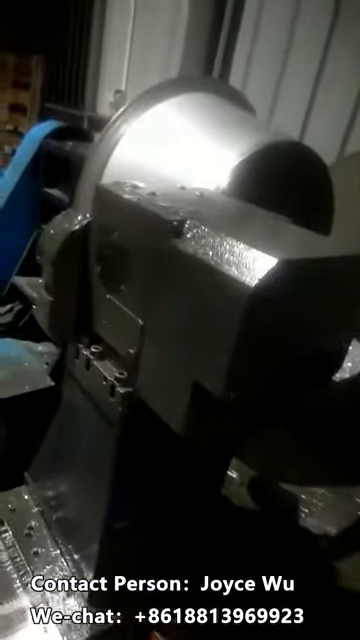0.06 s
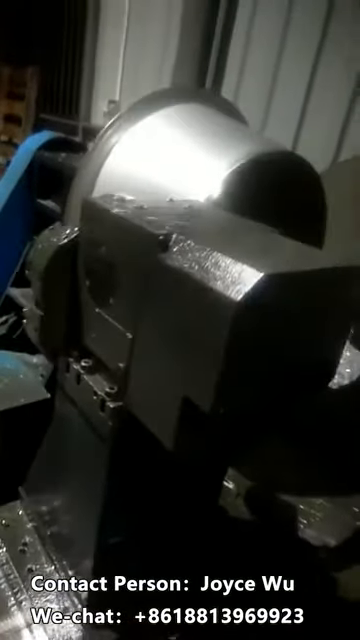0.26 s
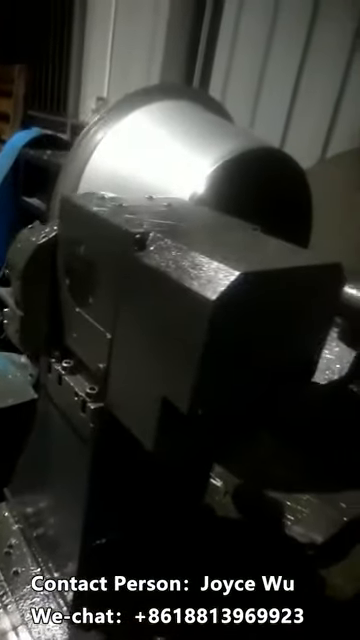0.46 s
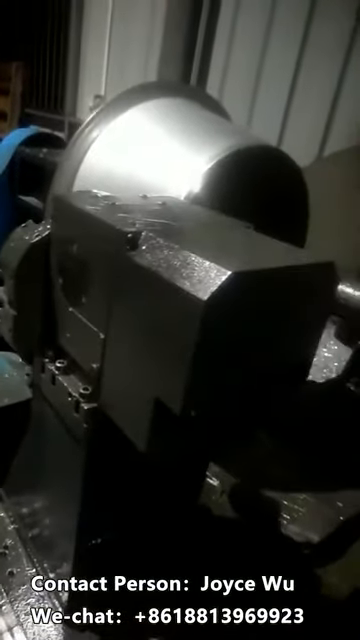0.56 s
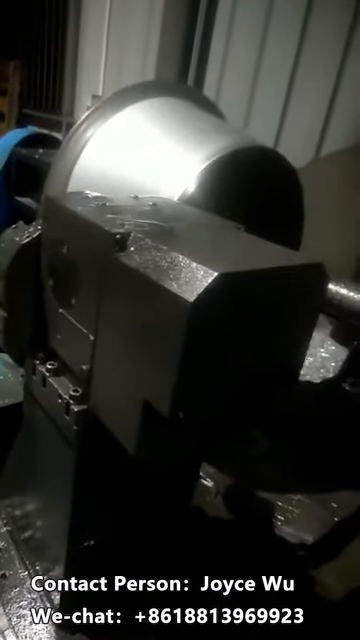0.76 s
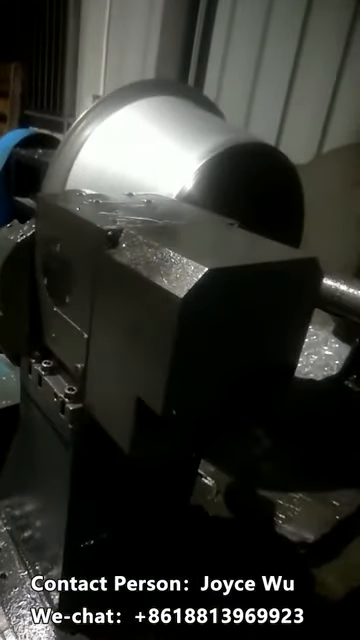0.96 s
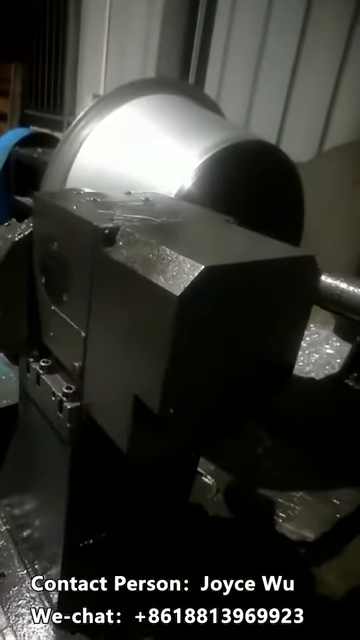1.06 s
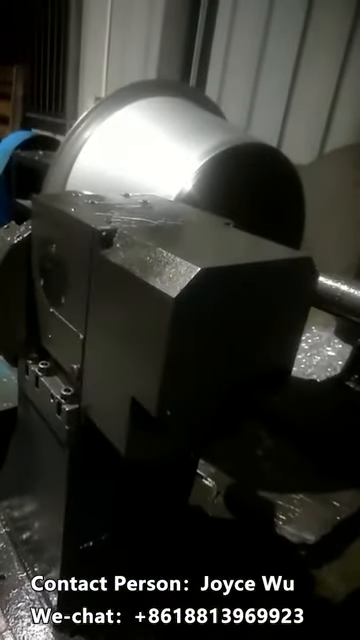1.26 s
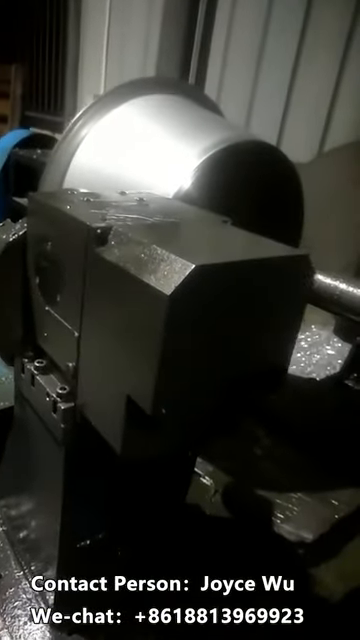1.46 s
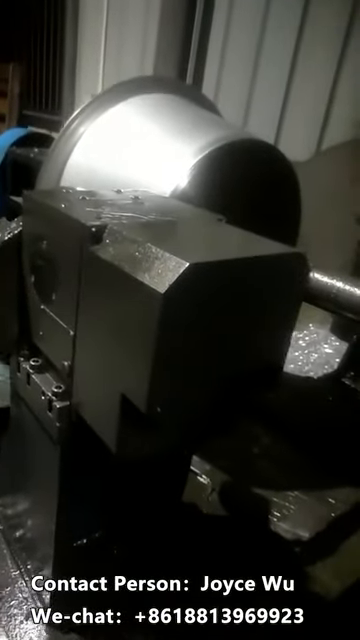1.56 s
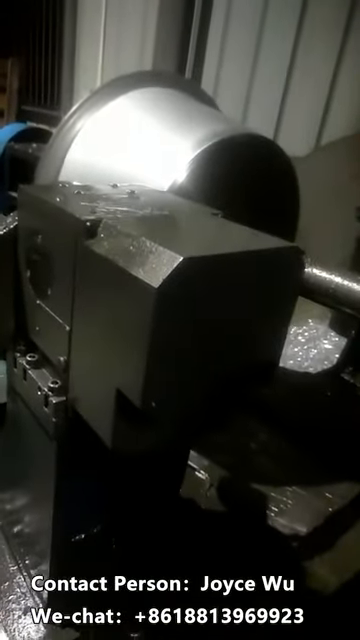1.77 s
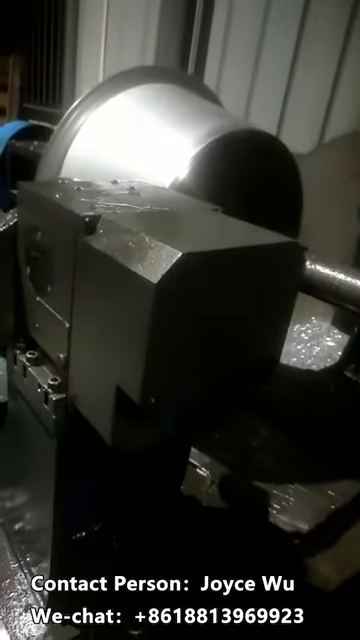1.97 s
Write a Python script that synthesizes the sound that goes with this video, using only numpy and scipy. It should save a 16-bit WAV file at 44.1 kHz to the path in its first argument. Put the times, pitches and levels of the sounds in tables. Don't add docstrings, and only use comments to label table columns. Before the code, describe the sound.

Metal squeal from a roller pressing a spinning metal shell, rising slightly over steady rubbing hiss

```python
import sys
import numpy as np
from scipy import signal
from scipy.fft import rfft, irfft
from scipy.io import wavfile
from scipy.ndimage import uniform_filter1d

SR = 44100
rng = np.random.default_rng(int(sys.argv[2]) if len(sys.argv) > 2 else 0)


def bounce(signal):
    frames = np.transpose(np.atleast_2d(signal))
    limited = np.clip(frames, -1, 1)
    pcm = np.round(limited * 32767).astype(np.int16)
    wavfile.write(sys.argv[1], SR, pcm)


def convert_level_to_amplitude(level_db):
    exponent = np.asarray(level_db, float) / 20
    return 10 ** exponent


N = 88244

# (time [s], level [dB], readiness to be kept [-2..2])
AIR_COURSE = [(0, -78, 0.7), (.28, -74, .3), (.5, -82.5, -1.3), (.72, -66.5, -1.1), (.9, -65, 1.6),
              (1.3, -62, 1.8), (1.7, -68.5, 1.9), (2.0, -70.5, 0.17)]
# (frequency [Hz], level [dB])
AIR_COLOUR = [(4500, 18.5), (4720, 5.5), (4950, -0.5), (5200, 9), (5500, 3), (6200, 1), (7000, -5),
              (9600, -5.5)]
# (frequency [Hz], width [Hz], level [dB])
WHISTLES = [(5210, 150, -67.5), (4710, 150, -67), (5770, 120, -77.5)]
# (time [s], hum level [dB], rumble level [dB])
MOTOR_SURGE = [(0, -57, -70), (.12, -68, -69), (.18, -89.5, -84), (.3, -93, -58.5), (.46, -72, -72.5),
               (.57, -36, -47), (.65, -35, -47), (.72, -34.5, -49), (.8, -53, -62), (.9, -48, -60.5),
               (1.03, -54.5, -67), (1.1, -66.5, -67.5), (1.22, -81.5, -63), (1.45, -84.5, -67),
               (1.6, -82.5, -79.5), (1.75, -75.5, -80), (2.0, -69, -69)]
# (frequency [Hz], level [dB], wobble [dB], phase slip [rad])
MOTOR_HUM = [(118, -0.5, 3, 0.26), (101, -10.5, 3.5, .6), (131, -9.5, 6.5, 0.57)]
# (frequency [Hz], density [dB per Hz])
HISS_SPECTRUM = [(150, -50), (400, -15), (650, -20.5), (900, 0), (1350, -7.5), (2600, -2), (3550, -12),
                 (4400, -34.5)]
# (frequency [Hz], width [Hz], level [dB], drift [dB/s])
SHELL_RINGS = [(368.8, 19, -51.5, -8.5), (601, 30, -65, 4.5), (861, 19, -40.5, -10.5),
               (896, 11, -48.5, 4.9), (1164, 20, -48, 2), (2560, 60, -40, -4.5), (2648, 130, -39, -1.5),
               (2804, 210, -38.5, -1.5)]
# (time [s], fundamental [dB], third overtone [dB], higher overtones [dB], hiss [dB],
# hiss tilt [dB/octave])
SLIP_SHAPE = [(0, -6, -4, 0, 0.5, 0.5), (.12, -3, 0.5, -1, -1.5, 0.5), (.35, 1, -2.5, 1.5, 1.5, 0.5),
              (.62, -2, -2.5, -8.5, 2.5, -0.5), (.74, -3.5, -3, 8, 0, -1), (.8, -12, -2, -3.5, 2.5, 2),
              (.86, -5.5, -1, 8.5, -1.5, 2), (.905, -3, -1, -3.5, 3.5, 2.5), (.96, 0, 8, 5.5, 0, 1.5),
              (1.02, -6.5, 3.5, 2.5, -0.5, 3), (1.2, 4.5, 5.5, 0.5, -3.5, 1.5),
              (1.35, 1.5, -4.5, 4, -2.5, 0.5), (1.41, -1, 0, -8.5, -1.5, 1), (1.5, -0.5, -5.5, 1.5, -3, 0),
              (1.6, 4, -10, -5.5, -3.5, 2.5), (1.76, -6.5, -1.5, -3.5, -1.5, 2.5),
              (1.9, 5.5, 1.5, -0.5, 2, 3), (2.0, -0.5, 3, -2.5, -3, 3.5)]
# (time [s], frequency [Hz])
CHATTER_PITCH = [(0, 475.5), (.26, 480.5), (.52, 491.5), (.78, 502), (1.0, 509), (1.2, 512.8),
                 (1.45, 511.8), (1.75, 510), (2.0, 506)]
# (time [s], squeal level [dB])
ROLLER_CONTACT = [(0, -25.5), (.12, -22), (.26, -20), (.38, -20), (.52, -24), (.7, -23), (.85, -25),
                  (1.0, -24.5), (1.07, -21.5), (1.2, -27), (1.3, -22.5), (1.45, -21), (1.65, -19),
                  (1.78, -18.5), (1.86, -26), (1.94, -19), (2.0, -20.5)]
# (multiple [1], level [dB], wobble [dB], skirt [dB], share of slip shape followed [0..1])
OVERTONES = [(1, -24, 1.9, -10, 1), (2, -1, -0.68, -9.5, 1), (3, -9, 0.25, -5.5, 1), (4, -20, 0, -5, 1),
             (5, -14, 2, -1.5, 0.68), (6, -17.5, 3, 0.5, 0.1), (7, -30, 6, 6.5, 0.55),
             (8, -34, 1, -4.5, 0.47), (9, -41.5, -0.5, -0.5, .3)]
# (frequency [Hz], width [Hz], lift [dB])
SHELL_MODES = [(506.6, 29, 12), (1649, 82, 5.5), (2098, 180, 17.5), (2550, 90, 1), (3065, 80, -1.5)]
# (time [s], length [s], depth [dB])
ROLLER_SKIPS = [
    (0.058, .03, -6.5),
    (0.188, 0.034, -6.5),
    (.31, 0.046, -14.5),
    (0.443, 0.033, -5.5),
    (0.634, 0.016, 0.5),
    (1, 0.028, -6),
    (1.122, 0.037, -10.5),
    (1.732, 0.028, -12),
    (1.922, 0.014, -27),
    (1.968, 0.026, -5),
]

AIR_DB, BED_DB = -12.5, -87.5
PATCH_HZ, PATCH_S, PATCH_SCATTER_DB, DROPPED_DB = 217, 0.039, 3.5, -26.5
KEEP_DB = 12
HISS_DB, FLICKER_DB, SWELL_DB = -26, 1.55, -0.76
SHAFT_HZ, SHAFT_DB, SKIRT_HZ = 10, 2, 23.8
VOICE_TOP_HZ = 4385


def curve(table, column):
    rows = np.array(table, float)
    return np.interp(np.arange(N) / SR, rows[:, 0], rows[:, column])


def unit(x):
    return x / np.sqrt(np.mean(np.abs(x) ** 2))


def band(hz, width_hz, order=2):
    f_hz = np.arange(N // 2 + 1) * SR / N
    bell = np.exp(-0.5 * (2 * (f_hz - hz) / width_hz) ** order)
    return unit(irfft(rfft(rng.standard_normal(N)) * bell, N))


def walk(rate_hz):
    return band(0, 2 * rate_hz)


def hold_patch(x):
    hold = int(PATCH_S * SR)
    return np.repeat(x[::hold], hold)[:N]


def air():
    patches, colour = 0, np.array(AIR_COLOUR, float)
    for k in range(24):
        hz = 4500 + k * PATCH_HZ
        colour_db = np.interp(hz, colour[:, 0], colour[:, 1])
        readiness = curve(AIR_COURSE, 2) + walk(6) + colour_db / KEEP_DB
        kept = hold_patch(readiness > 0) * 1.0
        db = colour_db + DROPPED_DB * (1 - kept) + PATCH_SCATTER_DB * hold_patch(walk(8))
        patches = patches + uniform_filter1d(convert_level_to_amplitude(db), size=500) * band(hz, PATCH_HZ, order=8)
    whistles = 0
    for hz, width_hz, db in WHISTLES:
        wobble_db = 1.7 * walk(9)
        gate_db = -29 * uniform_filter1d((walk(7) < 0) * 1.0, size=700)
        whistles = whistles + convert_level_to_amplitude(db + wobble_db + gate_db) * band(hz, width_hz, order=8)
    bed = convert_level_to_amplitude(BED_DB) * band(7100, 5000, order=8)
    return convert_level_to_amplitude(curve(AIR_COURSE, 1) + AIR_DB) * patches + whistles + bed


def motor():
    t, hum = np.arange(N) / SR, 0
    for hz, db, wobble_db, slip_rad in MOTOR_HUM:
        gain = convert_level_to_amplitude(db + wobble_db * walk(11))
        hum = hum + gain * np.sin(2 * np.pi * hz * t + slip_rad * walk(6))
    rumble = convert_level_to_amplitude(2 * walk(27)) * band(240, 220)
    rumble = rumble + convert_level_to_amplitude(-25.5 + 4 * walk(8)) * band(35, 50)
    return convert_level_to_amplitude(curve(MOTOR_SURGE, 1)) * unit(hum) + convert_level_to_amplitude(curve(MOTOR_SURGE, 2)) * rumble


def rubbing_hiss():
    out, swell, rows = 0, walk(2), np.array(HISS_SPECTRUM, float)
    tilt_db = curve(SLIP_SHAPE, 5)
    for hz in 150 * 2 ** (np.arange(21) / 4):
        density_db = np.interp(np.log(hz), np.log(rows[:, 0]), rows[:, 1])
        db = density_db + 10 * np.log10(hz) + tilt_db * np.log2(hz / 2000)
        out = out + convert_level_to_amplitude(db + SWELL_DB * swell + FLICKER_DB * walk(3)) * band(hz, hz / 4)
    return convert_level_to_amplitude(HISS_DB + curve(SLIP_SHAPE, 4)) * unit(out)


def shell_ringing():
    t, out = np.arange(N) / SR, 0
    for hz, width_hz, db, drift_db in SHELL_RINGS:
        out = out + convert_level_to_amplitude(db + drift_db * t + 2 * walk(3.4)) * band(hz, width_hz)
    return out


def skips_db():
    t = np.arange(N) / SR
    return sum(db * np.exp(-0.5 * (2 * (t - at_s) / length_s) ** 2) for at_s, length_s, db in ROLLER_SKIPS)


def squeal():
    t, out = np.arange(N) / SR, 0
    hz = uniform_filter1d(curve(CHATTER_PITCH, 1), size=4000, mode="nearest")
    phase = 2 * np.pi * np.cumsum(hz + 0.5 * walk(12)) / SR
    for k, (_, db, wobble_db, skirt_db, follow) in enumerate(OVERTONES, 1):
        lift_db = sum(up_db / (1 + (2 * (k * hz - mode_hz) / width_hz) ** 2)
                      for mode_hz, width_hz, up_db in SHELL_MODES)
        turn_db = SHAFT_DB * (k > 4) * np.sin(2 * np.pi * (SHAFT_HZ * t + rng.random()))
        if k == 2:
            contact_db = curve(ROLLER_CONTACT, 1) + skips_db()
        else:
            slip_column = {1: 1, 3: 2}.get(k, 3)
            contact_db = -23 + follow * curve(SLIP_SHAPE, slip_column)
        skirt_hz = SKIRT_HZ * np.sqrt(k)
        skirt = convert_level_to_amplitude(skirt_db) * (walk(skirt_hz) + 1j * walk(skirt_hz)) / np.sqrt(2)
        gain = convert_level_to_amplitude(contact_db + db + lift_db + turn_db + wobble_db * walk(7.5))
        carrier = np.exp(1j * (k * phase + 2 * np.pi * rng.random()))
        out = out + np.sqrt(2) * gain * np.real((1 + skirt) * carrier)
    return out


def scene():
    voice_band = signal.ellip(10, 0.5, 70, VOICE_TOP_HZ, fs=SR, output="sos")
    shell = squeal() + rubbing_hiss() + shell_ringing()
    return (signal.sosfilt(voice_band, shell) + motor() + air())[None]


def roll_off(x):
    return signal.sosfilt(signal.butter(12, 9660, fs=SR, output="sos"), x)


def record(dry):
    return roll_off(dry)


dry = scene()
out = record(dry)
bounce(out)
```